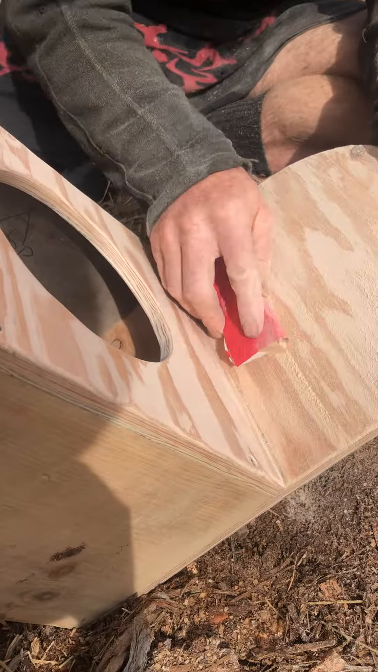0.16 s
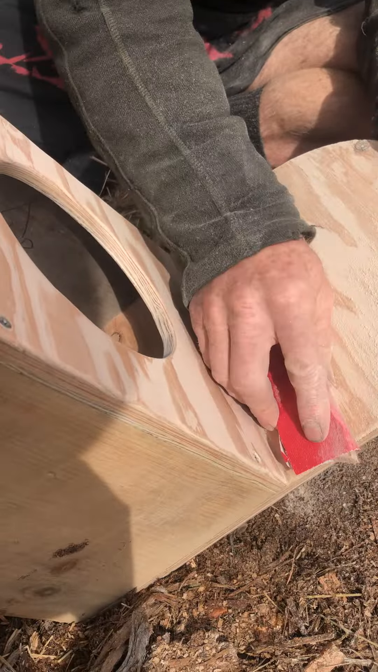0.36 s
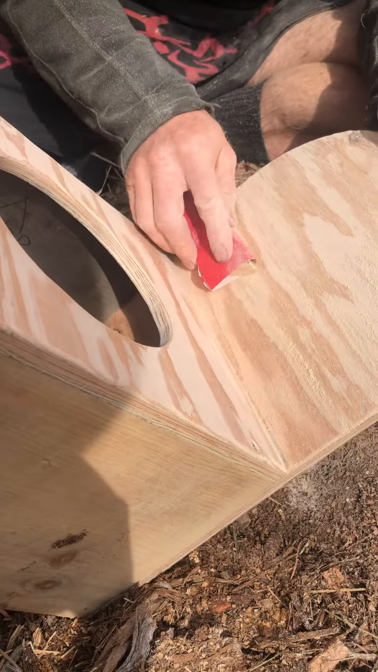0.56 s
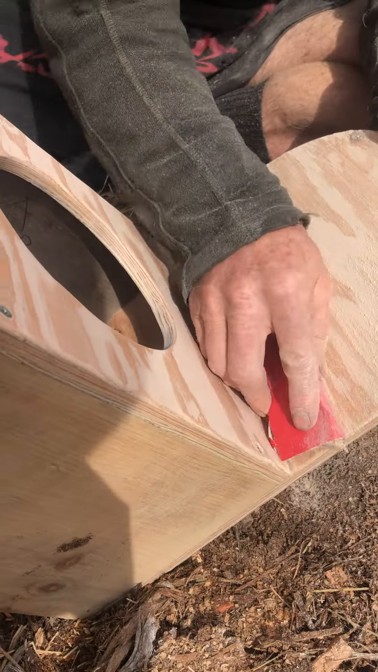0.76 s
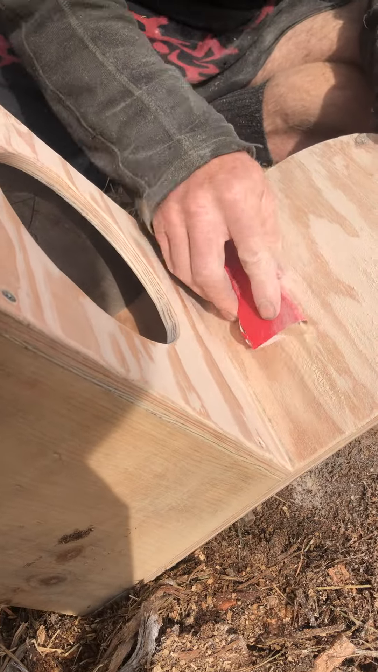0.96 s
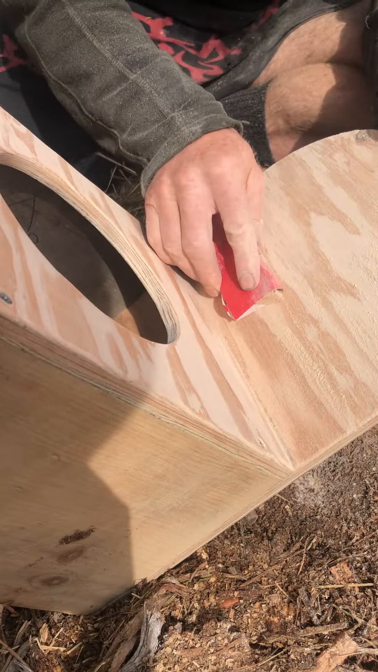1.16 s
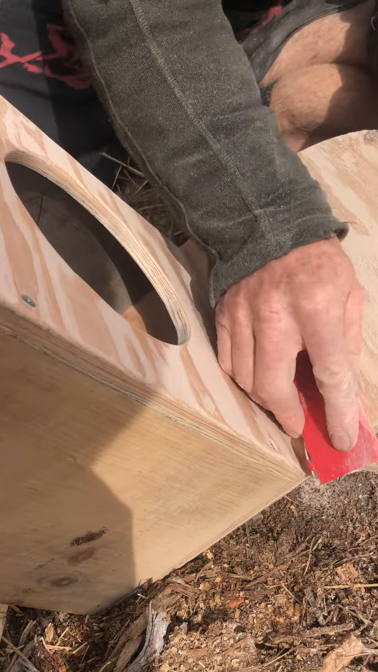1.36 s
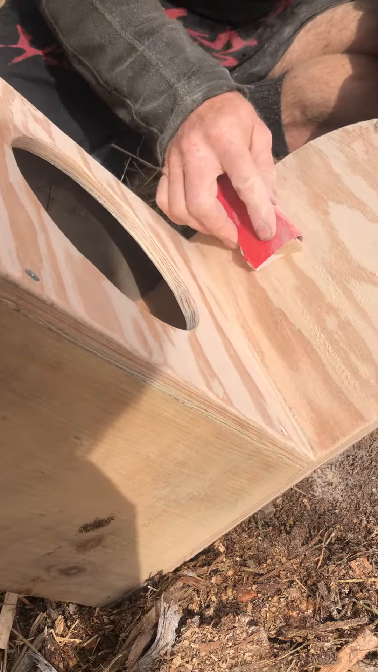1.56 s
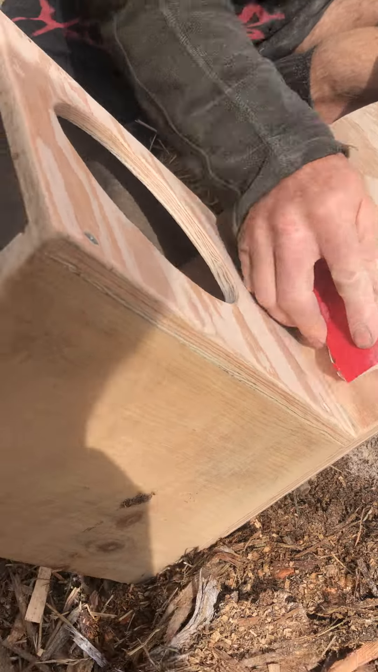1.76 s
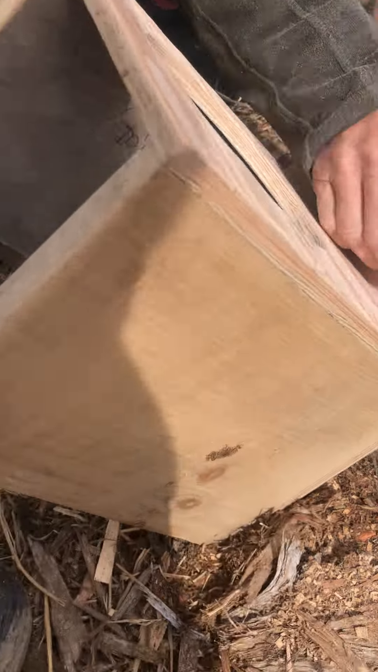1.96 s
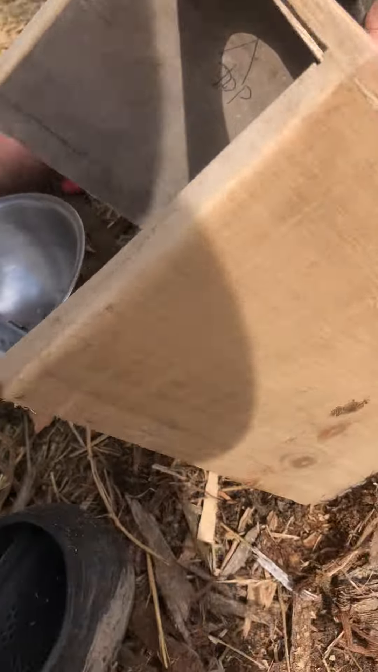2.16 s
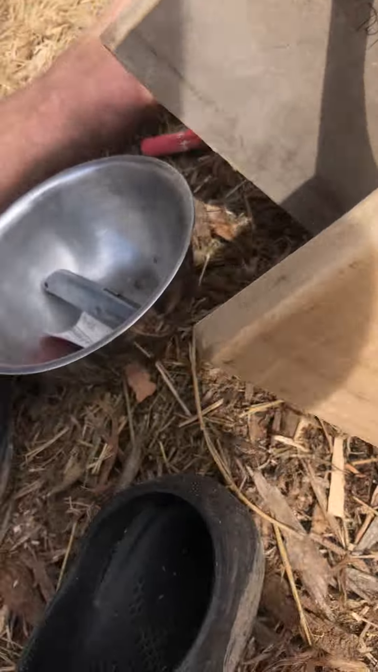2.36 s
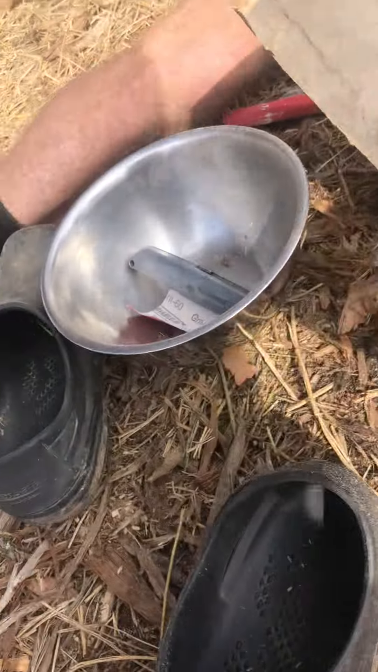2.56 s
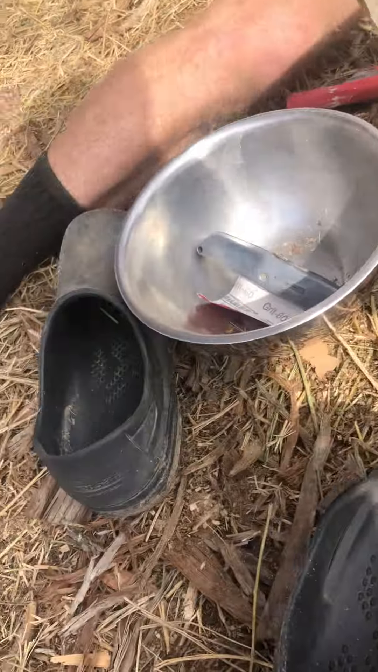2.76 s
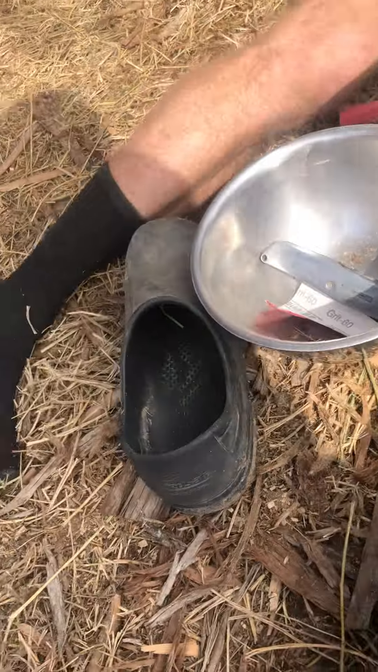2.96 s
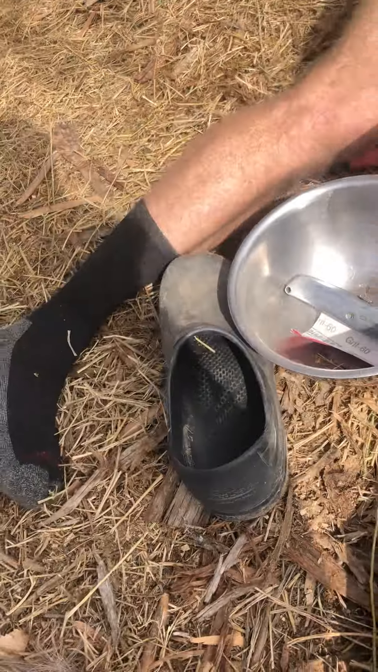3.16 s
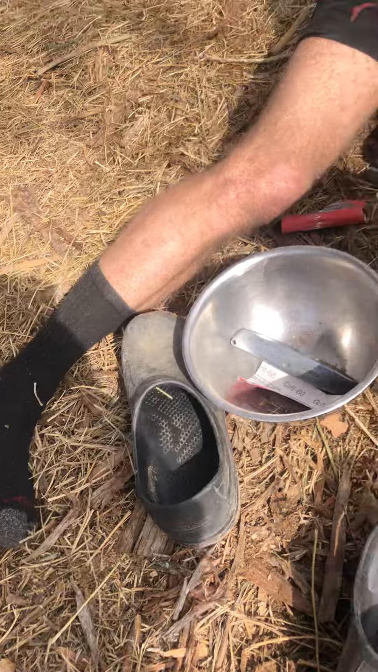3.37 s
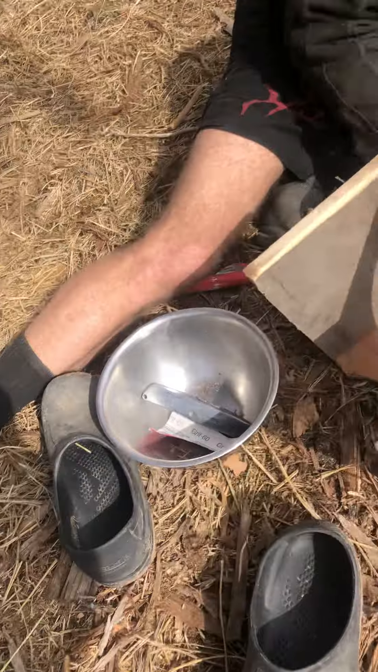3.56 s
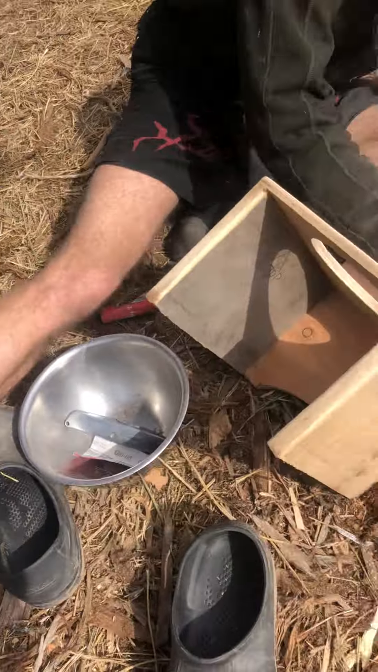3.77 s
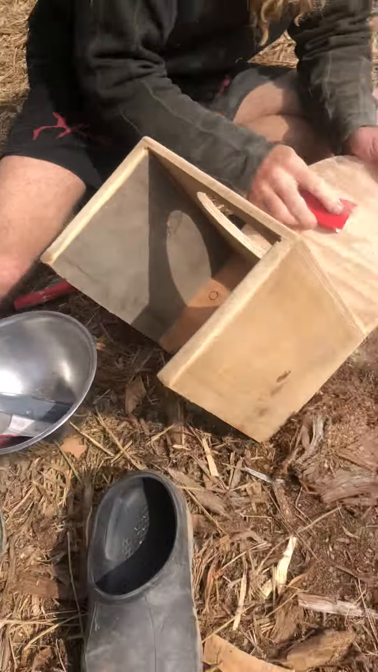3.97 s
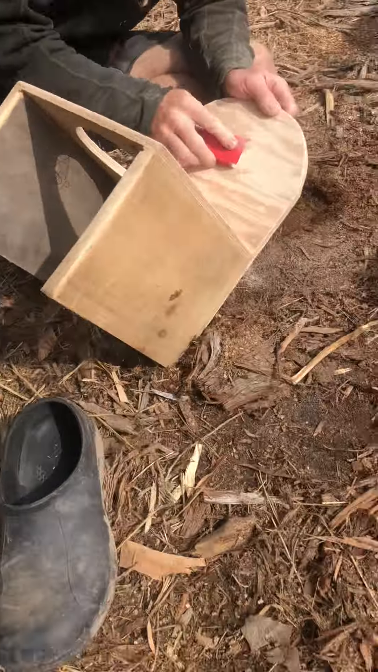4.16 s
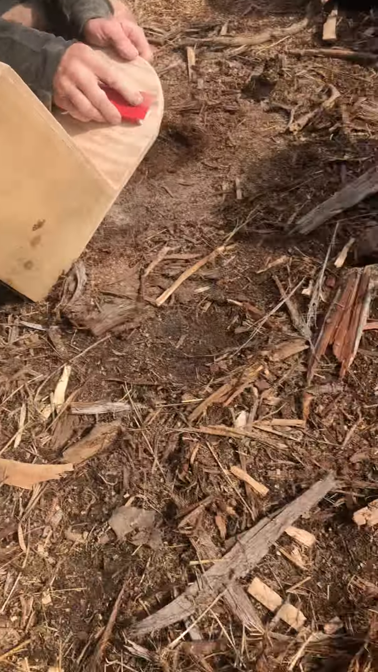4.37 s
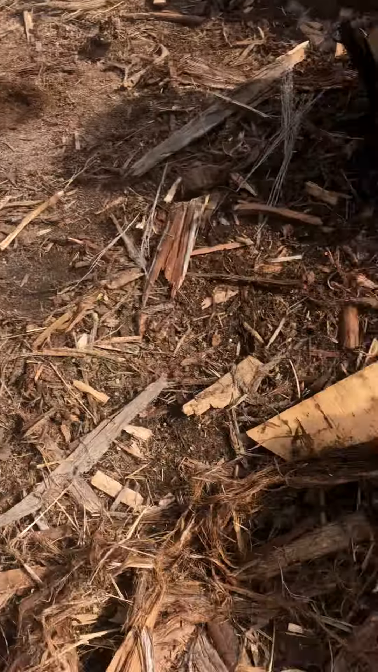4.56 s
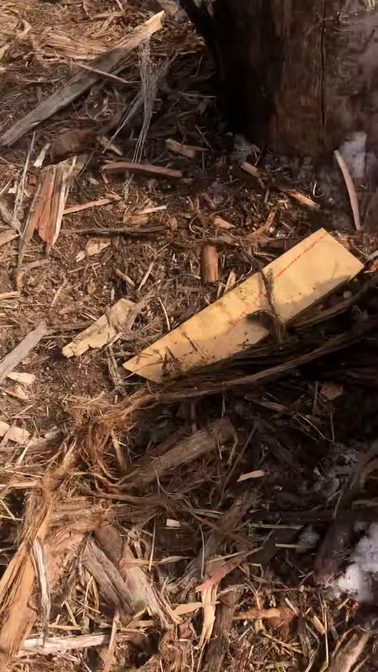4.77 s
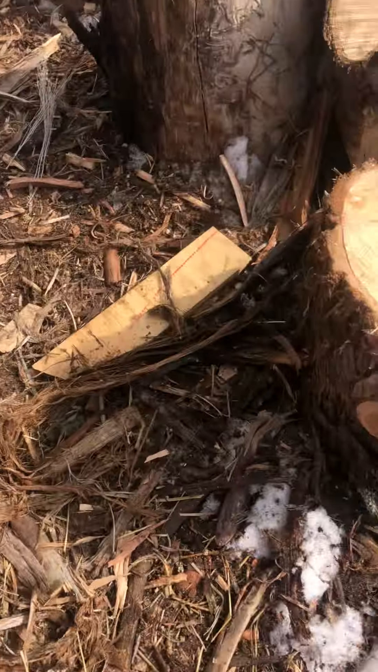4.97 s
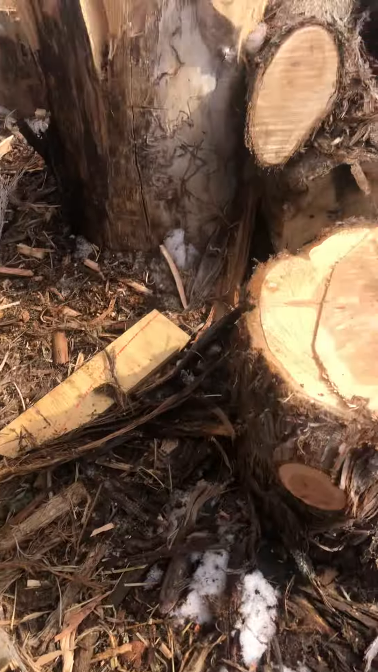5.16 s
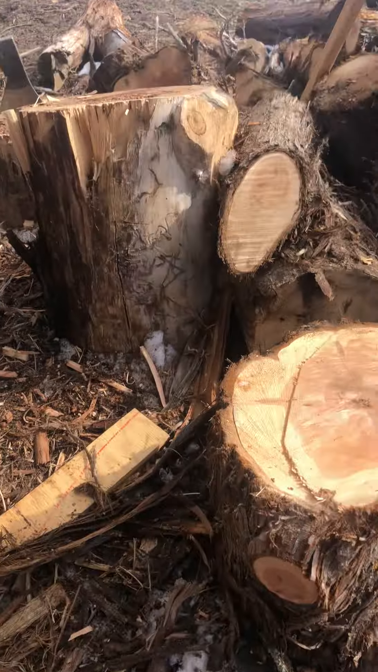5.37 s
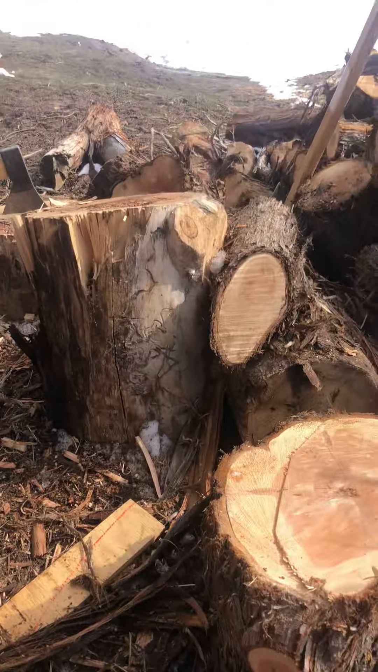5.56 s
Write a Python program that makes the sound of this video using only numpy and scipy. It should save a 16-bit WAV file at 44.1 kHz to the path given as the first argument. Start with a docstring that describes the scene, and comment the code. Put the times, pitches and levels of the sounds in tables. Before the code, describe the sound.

Quick, even strokes of hand sanding on plywood hiss and recede, with low wind rumble and thumps on the microphone.

```python
"""A sanding block rubs back and forth over a plywood box outdoors, about four strokes a second.
The grit hisses and sets the panels ringing, harder bites chatter, and the hand stops at every turn.
The microphone starts above the work and swings away, so the sanding fades and changes colour.
A light wind buffets the microphone with rumble and thumps, over a quiet bed of open air."""
import sys
import numpy as np
from scipy import signal
from scipy.fft import rfft, irfft, next_fast_len
from scipy.io import wavfile
from scipy.ndimage import uniform_filter1d, map_coordinates

SR = 44100
rng = np.random.default_rng(int(sys.argv[2]) if len(sys.argv) > 2 else 0)


def store_wav(level_fs):
    """Save 16-bit WAV to argv[1]."""
    pcm = np.round(np.clip(np.atleast_2d(level_fs), -1, 1) * 32767)
    wavfile.write(sys.argv[1], SR, pcm.T.astype(np.int16))


N = 247837

# strokes, alternately back and out: (start [s], stop [s], pressure [dB])
STROKES = [(-.157, .073, -2), (.092, .343, 0.5), (.358, .591, -0.5), (.613, .842, 1), (.864, 1.102, 0),
           (1.127, 1.369, 1), (1.387, 1.626, -0.5), (1.644, 1.881, 1), (1.901, 2.138, -1),
           (2.157, 2.378, -0.5), (2.395, 2.621, -1), (2.644, 2.868, .5), (2.891, 3.115, 1),
           (3.138, 3.35, 1), (3.368, 3.597, 0.5), (3.613, 3.839, 1), (3.855, 4.078, 0), (4.1, 4.324, .5),
           (4.347, 4.559, 0), (4.583, 4.804, 0), (4.82, 5.017, 1), (5.04, 5.233, -.5), (5.251, 5.461, 0),
           (5.484, 5.682, -0.5)]
# stroke shape heard from above, back then out: (moment of top speed [0-1], swell exponent)
STROKE_SHAPES = [(0.59, 1.23), (0.46, 1.71)]
# microphone move: (time [s], place [0 above, 1 beside, 2 or more further off])
MIC_PATH = [(0, 0.4), (1.4, 0.29), (1.95, 0.47), (2.35, 1.08), (3.9, 1.35), (4.6, 1.65), (5.6, 2.5)]
# fade as the microphone swings away: (time [s], hiss level [dB], panel level [dB])
FADE = [(0, -22.5, -30), (1.75, -24.5, -30), (2.25, -28, -31), (2.5, -31, -31), (3.1, -36, -38),
        (3.8, -32.5, -37.5), (4.25, -32.5, -37), (5.1, -34.5, -40), (5.6, -33, -38.5)]
# grit hiss colour from above, beside and further off: (frequency [Hz], relative density [dB])
HISS_ABOVE = [(1470, -20.5), (2500, -11), (2810, 1.5), (3450, -8.5), (4420, -9), (5650, -3), (6340, -6.5),
              (10400, -5), (11500, -8), (14900, -5), (15700, -10.5)]
HISS_BESIDE = [(1470, -31), (2500, -4.5), (3760, -1), (5560, -1.5), (10500, -4), (11800, -10), (15100, -7),
               (15700, -7)]
HISS_FAR = [(1470, -37), (2500, -12.5), (2760, -9), (3200, -2.5), (4000, -0.5), (4700, -1.5), (5960, -3),
            (6740, -2.5), (7220, -2), (8360, -3.5), (12500, -7.5), (14200, -3), (15700, -5.5)]
# a moving bell of boost or cut on the hiss: (time [s], centre [Hz], gain [dB])
SHEEN = [(0, 5560, -1.5), (2.4, 6540, 2.5), (3.1, 6200, -1), (3.5, 5370, 2.5), (3.8, 5700, 1.5),
         (4.0, 4700, 1), (4.3, 4830, -4), (4.7, 6100, 6), (4.95, 5740, 6.5), (5.17, 6700, 5),
         (5.3, 4000, 1.5), (5.55, 3670, 4.5)]
# plywood modes and their balance: (frequency [Hz], width [Hz], above [dB], beside [dB], far [dB])
PANEL_MODES = [(537.5, 41, -25, -20, -14), (599, 167, -12.5, -9.5, -9.5), (778, 85, -13, -12, -5),
               (965, 105, 1.5, -3.5, 0), (1060, 370, -11, 2.5, -19), (1301, 350, -6.5, -1.5, 2),
               (1520, 260, -5.5, -1.5, -1.5), (1782, 175, -3.5, -1.5, -4), (2090, 1000, 1, -6.5, 3.5),
               (2680, 560, -3.5, -2, -9), (3180, 840, -5, -9.5, 3)]
# outdoor bed: (frequency [Hz], relative density [dB])
AIR_SPECTRUM = [(20, -26), (70, -11), (250, -5), (450, -5), (900, -6.5), (2500, -21), (8000, -30.5),
                (16000, -27)]
# harder bites of the block: (peak time [s], pitch at the peak [Hz], level [dB])
BITES = [(.238, 943, -37), (.744, 1150, -39), (1.26, 999, -36), (1.555, 746, -46), (1.74, 2827, -30),
         (2.05, 958, -35), (2.55, 800, -51), (2.95, 830, -43), (3.3, 1300, -43), (4.03, 670, -45.5),
         (4.16, 1300, -39), (5.55, 1777, -43)]
# breeze on the microphone: (time [s], level [dB])
BREEZE = [(0, -68), (.25, -50), (.45, -39.5), (.9, -35.5), (1.4, -42), (1.57, -53.5), (2.65, -50.5),
          (3.0, -47), (3.45, -44), (3.75, -52.5), (4.2, -36.5), (4.7, -34), (5.5, -38), (5.62, -48)]
# gusts over the breeze: (start [s], length [s], peak level [dB])
GUSTS = [(0.505, 0.16, -24.5), (0.775, 0.082, -30), (1.041, 0.1, -20.5), (1.146, .11, -26.5),
         (1.673, 0.17, -28.5), (2.05, 0.11, -37.5), (2.43, 0.12, -41), (2.72, 0.083, -33),
         (3.477, 0.12, -38.5), (4.05, 0.17, -29.5), (4.373, .07, -18), (4.628, 0.06, -24.5),
         (5.391, 0.088, -27.5)]
# colour of the buffeting: (frequency [Hz], relative density [dB])
RUMBLE_SPECTRUM = [(13, -44), (22, -19), (52, 6.5), (81, 4.5), (136, 0), (258, -15.5), (348, -21.5),
                   (381, -31.5), (480, -31.5), (620, -64), (1060, -120)]
# eddies that thump the microphone port: (time [s], level [dB], starting pitch [Hz])
EDDIES = [(.786, -17, 230), (1.073, -12, 334), (2.729, -29, 196), (3.931, -28, 170), (3.993, -18.5, 139),
          (4.142, -21.5, 257), (4.186, -21.5, 288), (4.255, -26, 171), (4.386, -10.5, 200),
          (4.411, -15, 467), (4.826, -30.5, 284)]


def amp(db):
    """Decibels to gain."""
    return 10 ** (np.asarray(db) / 20)


def unit(x):
    """Scale to rms 1."""
    return x / np.sqrt(np.mean(x ** 2) + 1e-20)


def along(points, hz):
    """Read (frequency, value) points on a log frequency axis."""
    point_hz, values = np.transpose(points)
    return np.interp(np.log(hz + 1), np.log(point_hz + 1), values)


def curves(rows, t):
    """Automation lanes: each column after the time, read at the times t."""
    times, *lanes = np.transpose(rows)
    return [np.interp(t, times, lane) for lane in lanes]


def wobble(rate):
    """A smooth random curve, rate knots a second."""
    knots = rng.standard_normal(int(N * rate / SR) + 4)
    return map_coordinates(knots, [np.arange(N) * rate / SR])


def filtered(x, response):
    """Equalise x with a gain given as a function of frequency."""
    size = next_fast_len(N + 8192)
    return irfft(rfft(x, size) * response(np.fft.rfftfreq(size, 1 / SR)), size)[..., :N]


def coloured_noise(spectrum):
    """Noise of rms 1 with the given spectrum."""
    return unit(filtered(rng.standard_normal(N), lambda hz: amp(along(spectrum, hz))))


def perspective(values, t):
    """Crossfade the values for above, beside and further off as the microphone moves."""
    place = np.clip(curves(MIC_PATH, t)[0], 0, 2)
    return sum(value * np.clip(1 - abs(place - k), 0, 1) for k, value in enumerate(values))


def arm_strokes(t, least_rub=0.13, break_s=0.0061, stick_s=0.014, panel_swell=0.53):
    """Hiss and panel envelopes: the block breaks loose, speeds up, slows and sticks again."""
    hiss, panel = np.zeros((2, N))
    far_shape = (0.55, 1.18)  # both directions sound alike once the microphone has moved off
    for k, (start, stop, pressure_db) in enumerate(STROKES):
        top_at, hiss_swell = perspective(np.array([STROKE_SHAPES[k % 2], far_shape, far_shape]), start)
        on = (t > start) & (t < stop)
        progress = (t[on] - start) / (stop - start)
        speed = np.sin(np.pi * np.interp(progress, [0, top_at, 1], [0, .5, 1]))
        sliding = np.minimum(1, np.minimum((t[on] - start) / break_s, (stop - t[on]) / stick_s))
        rub = least_rub + (1 - least_rub) * speed
        # the hiss grows faster with speed than the panel sound, so mid-stroke is brightest
        hiss[on] += amp(pressure_db) * sliding * rub ** hiss_swell
        panel[on] += amp(pressure_db) * sliding * rub ** panel_swell
    hiss_db, panel_db = curves(FADE, t)
    return amp(hiss_db) * hiss, amp(panel_db) * panel


def grit(clump_db):
    """Countless grains catch and tear wood fibres, in small clumps."""
    return unit(rng.standard_normal(N) * amp(clump_db * wobble(700)))


def grit_hiss(patchy_db=1.66, sheen_octaves=0.14):
    """Direct hiss of the grit, rms 1; its colour shifts as the microphone moves, with a wandering bell of boost
    or cut."""
    hz, t, spectra = signal.stft(grit(clump_db=0.55), SR, nperseg=512)
    colour_db = perspective([along(s, hz)[:, None] for s in (HISS_ABOVE, HISS_BESIDE, HISS_FAR)], t)
    sheen_hz, sheen_db = curves(SHEEN, t)
    bell = np.exp(-.5 * (np.log2((hz[:, None] + 1) / sheen_hz) / sheen_octaves) ** 2)
    patches = uniform_filter1d(rng.standard_normal(spectra.shape), size=5, axis=0)
    patches = uniform_filter1d(patches, size=18, axis=1)
    gain = amp(colour_db + sheen_db * bell + patchy_db * unit(patches))
    gain /= np.linalg.norm(gain, axis=0)  # the colour moves while the level holds
    return unit(signal.istft(spectra * gain, SR, nperseg=512)[1][:N])


def panel_ring(drive, t, wander_db=2.5):
    """The grit rings the panels; each mode couples more or less as the block travels."""
    sound, power = np.zeros((2, N))
    for mode_hz, width_hz, *levels_db in PANEL_MODES:
        ring = lambda hz: (1j * hz * width_hz / (mode_hz ** 2 - hz ** 2 + 1j * hz * width_hz)) ** 2
        gain = amp(perspective(levels_db, t))
        force = drive * gain * amp(wander_db * wobble(14)) * grit(clump_db=2.0)
        sound += filtered(force, ring) * np.sqrt(2 * SR / (np.pi * width_hz))  # equal power at any width
        power += gain ** 2
    return sound / np.sqrt(power)


def yard_reflections(x, t60=0.22, dull_hz=3000):
    """Ground and woodpile send back a thin, dull spray of reflections."""
    age = np.arange(SR // 3) / SR
    tail = rng.standard_normal(len(age)) * amp(-60 * age / t60)
    wet = signal.fftconvolve(x, tail / np.linalg.norm(tail))[:N]
    return filtered(wet, lambda hz: 1 / np.hypot(1, hz / dull_hz))


def sanding(t, judder_db=0.78):
    """Hiss, panels and bites share the slight judder of the hand and the yard's reflections."""
    hiss_envelope, panel_envelope = arm_strokes(t)
    wood = amp(-2.0) * panel_ring(panel_envelope, t) + bites(t)
    judder = amp(judder_db * wobble(55))
    hiss = amp(1.28) * hiss_envelope * grit_hiss()
    direct = judder * (hiss + wood)
    return direct + amp(-17) * yard_reflections(direct)


def open_air():
    """A faint, steady bed of outdoor noise."""
    return amp(-55.5) * coloured_noise(AIR_SPECTRUM)


def bites(t, length_s=.12, sink_hz_per_s=2800, width_share=.08):
    """Each bite swells and fades as a narrow band of chatter that sinks as the block travels."""
    sound = np.zeros(N)
    for peak_s, peak_hz, db in BITES:
        offset = np.clip(t - peak_s, -length_s / 2, length_s / 2)
        phase = 2 * np.pi * np.cumsum(peak_hz - sink_hz_per_s * offset) / SR
        width_hz = width_share * peak_hz
        chatter = wobble(3.0 * width_hz) * np.cos(phase) + wobble(3.2 * width_hz) * np.sin(phase)
        sound += amp(db) * np.cos(np.pi * offset / length_s) * unit(chatter)
    return sound


def buffeting(t, flutter_db=2, lumps_db=3.3, rise_share=0.28):
    """Lumpy rumble from an unsteady breeze, with gusts that rise fast and fall slowly."""
    strength = amp(curves(BREEZE, t)[0] + flutter_db * wobble(31))
    for start, length, db in GUSTS:
        swell = np.interp((t - start) / length, [0, rise_share, 1], [0, 1, 0])
        strength = np.hypot(strength, amp(db) * np.sin(np.pi / 2 * swell))
    return strength * unit(coloured_noise(RUMBLE_SPECTRUM) * amp(lumps_db * wobble(35)))


def eddies(t, settle_hz=72, glide_s=0.0087, attack_s=0.00056, fall_20db_s=0.021):
    """Eddies thump the microphone port and slow to a low flutter."""
    sound = np.zeros(N)
    for start, db, first_hz in EDDIES:
        age = np.maximum(t - start, 0)
        turns = settle_hz * age + (first_hz - settle_hz) * glide_s * (1 - np.exp(-age / glide_s))
        envelope = amp(db - 20 * age / fall_20db_s) * (1 - np.exp(-age / attack_s))
        sound += envelope * np.sin(2 * np.pi * turns)
    return sound


def wind(t, ceiling_db=-17.0, low_cut_hz=45):
    """Buffeting and eddies flow through the narrow port, which saturates in the hardest puffs."""
    flow = amp(-0.5) * buffeting(t) + eddies(t)
    saturated = amp(ceiling_db) * np.tanh(flow / amp(ceiling_db))
    # the microphone is deaf to the slowest pressure swings
    return filtered(saturated, lambda hz: 1 - 1 / (1 + (hz / low_cut_hz) ** 4))


def scene():
    """Sanding, wind and quiet open air reach one microphone, alike in both channels."""
    t = np.arange(N) / SR
    mono = sanding(t) + wind(t) + open_air()
    return np.array([mono, mono])


def record(dry, top_hz=15850):
    """A brick-wall band limit takes off the very top of the treble."""
    return filtered(dry, lambda hz: hz < top_hz)


dry = scene()
out = record(dry)
store_wav(out)
```